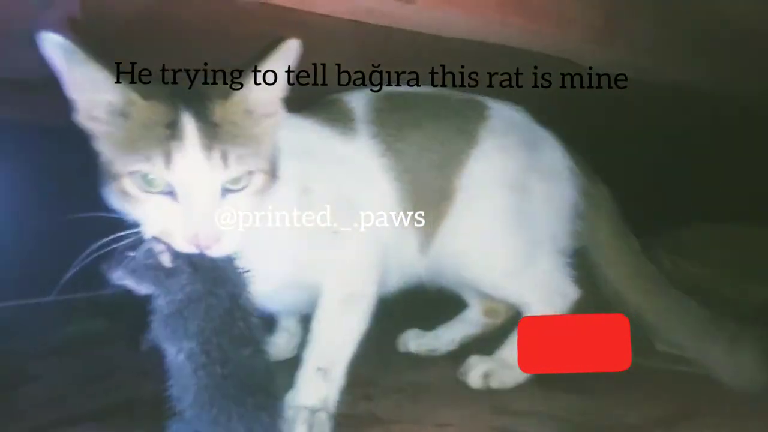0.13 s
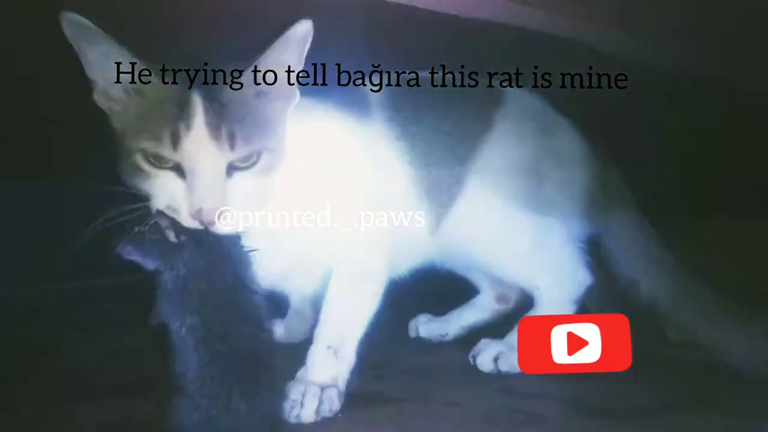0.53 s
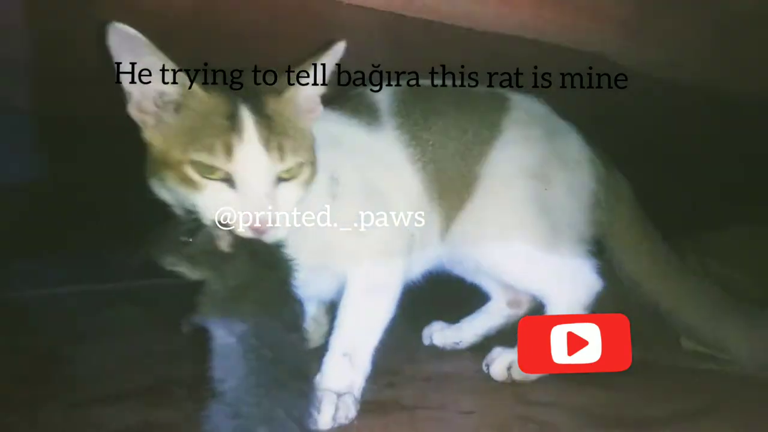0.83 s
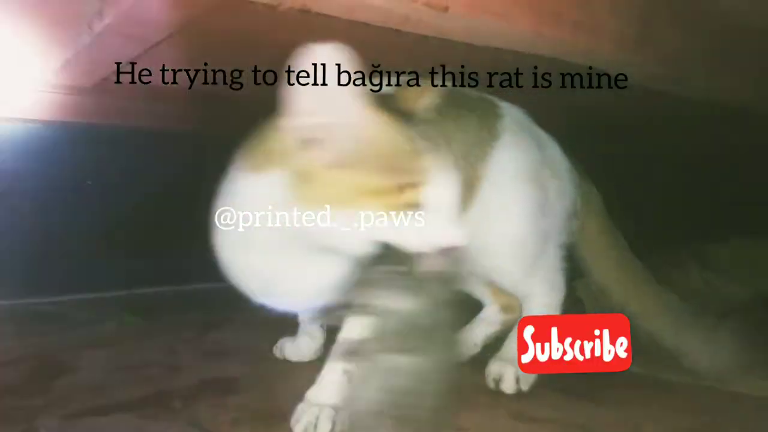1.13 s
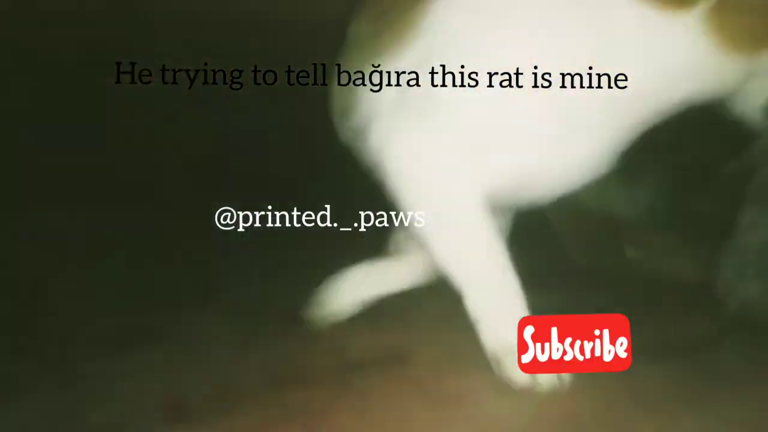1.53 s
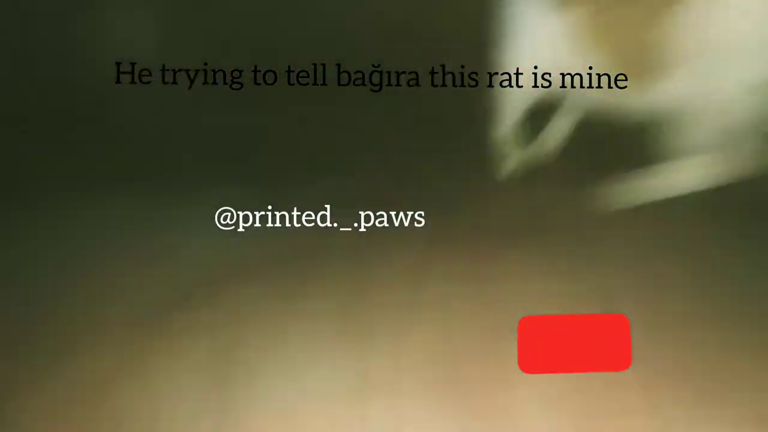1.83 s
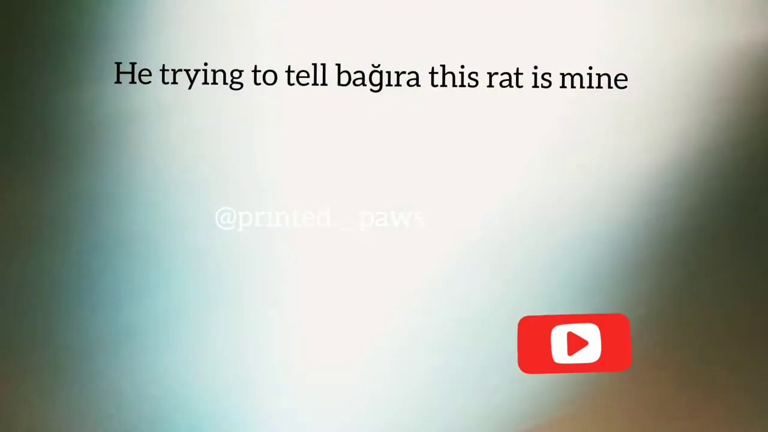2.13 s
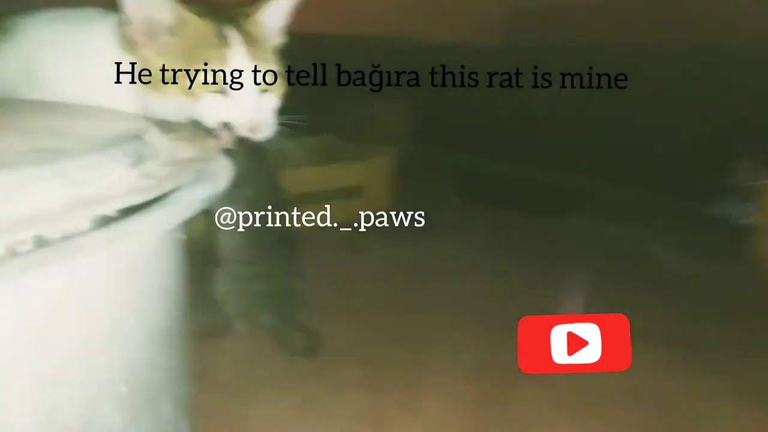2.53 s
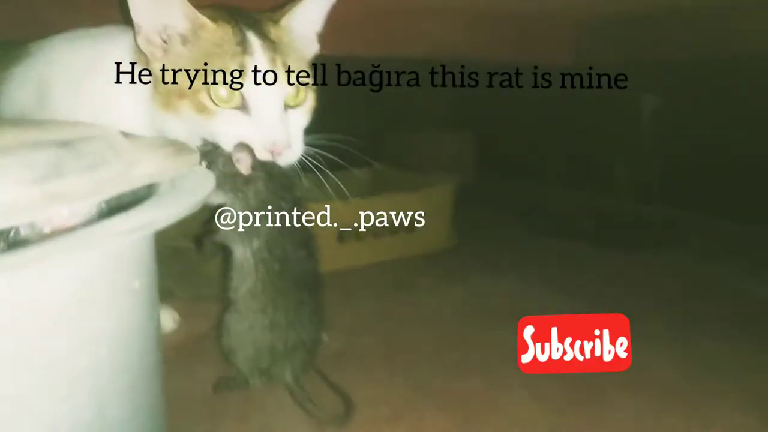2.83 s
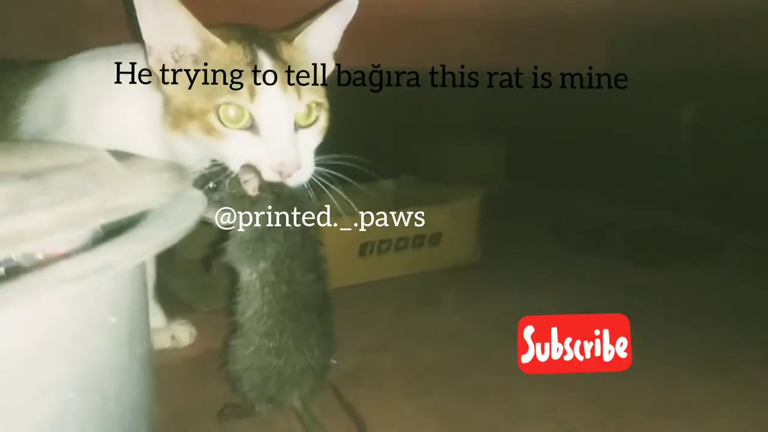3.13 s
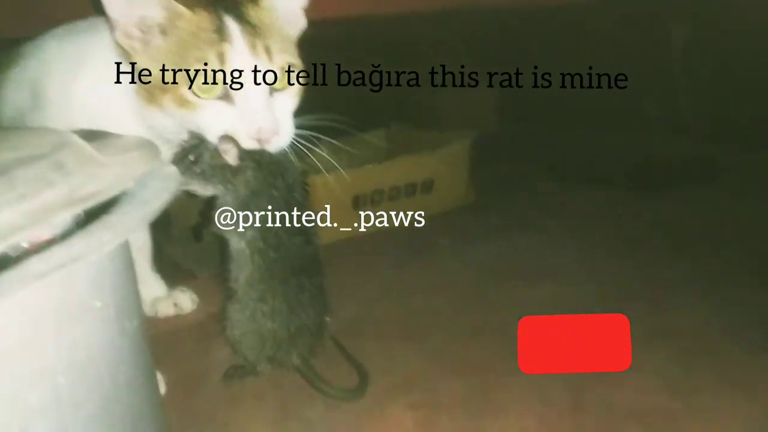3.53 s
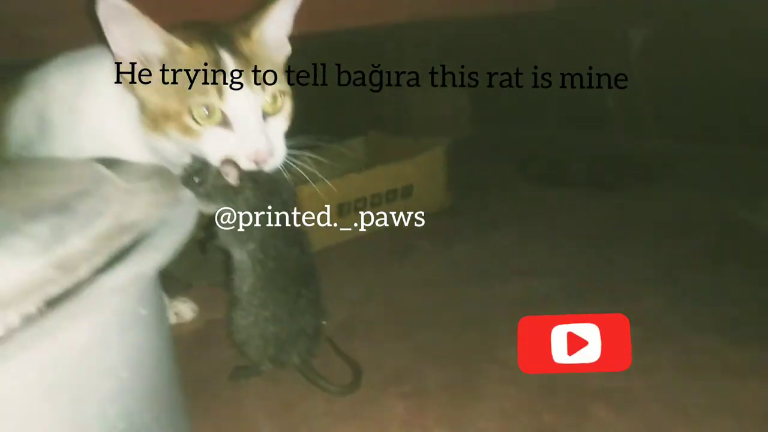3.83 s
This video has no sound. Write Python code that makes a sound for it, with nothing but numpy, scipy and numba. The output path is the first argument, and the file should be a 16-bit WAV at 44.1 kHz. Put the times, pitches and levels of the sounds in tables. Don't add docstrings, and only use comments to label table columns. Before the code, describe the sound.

Low, fluttering cat growl in a dark shed, with rustling, soft paw thuds and throbbing insect trill.

```python
import sys
import numpy as np
from scipy import signal
from scipy.fft import irfft
from scipy.io import wavfile
from scipy.ndimage import uniform_filter1d
from numba import njit

SR = 44100
rng = np.random.default_rng(int(sys.argv[2]) if len(sys.argv) > 2 else 0)


def wav_record(signal):
    frames = np.transpose(np.atleast_2d(signal))
    bounded = np.clip(frames, -1, 1)
    quanta = np.round(bounded * 32767).astype(np.int16)
    wavfile.write(sys.argv[1], SR, quanta)


def magnitude_from_level(level_db):
    exponent = np.asarray(level_db, float) / 20
    return 10 ** exponent


N = 176400


def unit(x):
    return x / np.sqrt(np.mean(x ** 2))


@njit
def svf(x, hz, width):
    y, b, l = np.empty(len(x)), 0., 0.
    g, k = np.tan(np.pi * hz / SR), width / hz
    for i in range(len(x)):
        v = (b + g * (x[i] - l)) / (1 + g * (g + k))
        b, l, y[i] = 2 * v - b, l + 2 * g * v, k * v
    return y


def band(x, hz, width):
    once = svf(x, 1. * hz, 1. * width)
    return svf(once, 1. * hz, 1. * width)


def walk(rate):
    k = int(SR / rate)
    steps = np.repeat(rng.standard_normal(N // k + 1), k)
    return 1.3 * uniform_filter1d(uniform_filter1d(steps, k), k)[:N]


def shape(table, hz):
    curve_hz, curve_db = np.array(table).T
    return np.interp(np.log(hz), np.log(curve_hz), curve_db)


def pair(hz, width, like):
    f = np.fft.rfftfreq(N, 1 / SR)
    near = np.abs(f - hz) < 3 * width
    spec = np.zeros((2, len(f)), complex)
    z = rng.standard_normal((2, 2, len(f)), dtype=np.float32)[:, :, near]
    bell = np.exp(-2 * ((f[near] - hz) / width) ** 2)
    spec[:, near] = (z[0] + 1j * z[1]) * bell
    middle, side = (unit(v) for v in irfft(spec, N))
    like = np.clip(like, 0, 1)
    return np.sqrt((1 + like) / 2) * middle + np.sqrt((1 - like) / 2) * side * np.array([[1], [-1]])


def hump(t, at, rise, fall):
    before = np.exp(-np.minimum((at - t) / rise, 9) ** 2)
    after = np.exp(-np.maximum(t - at, 0) / fall)
    return np.where(t < at, before, after)


def drones(t):
    # (pitch [Hz], width [Hz], level [dB], fade time [s])
    steady = [
        (1206, 79, -58, 1.63),
        (1239, 140, -61, 4.8),
        (1352, 105, -59.5, 1.01),
        (4190, 430, -63, 1.125),
        (14900, 900, -75, 0.5),
        (11870, 250, -69, 0.61),
        (500, 140, -64.5, 2.5),
    ]
    out = 0
    for hz, width, db, end in steady:
        fade_db = 14 / (1 + np.exp((end - t) / .12))
        out = out + magnitude_from_level(db + 2 * walk(10) - fade_db) * pair(hz, width, .1)
    return out


def rustle_and_night(t):
    # (peak time [s], rise [s], fall [s], level [dB], brightness [dB per octave])
    rustles = [(1.05, 0.045, 0.028, -69, 9), (1.535, 0.013, 0.012, -48, 5.5), (2.05, 0.21, 0.89, -56, -1.5),
               (2.13, 0.033, .06, -59, 8), (2.258, 0.13, 0.21, -44, 2.5), (2.36, 0.023, 0.047, -55.5, 7),
               (2.44, 0.14, 0.07, -55.5, 8), (2.6, 0.061, 0.038, -68, -7), (2.772, 0.049, 0.053, -52, 7),
               (3.092, 0.045, 0.11, -46, 6.5), (3.26, 0.032, 0.025, -59.5, 10), (3.2, 0.82, 1, -57.5, -3),
               (3.424, .006, 0.0084, -50, 11), (1.495, 0.011, .01, -60, 4.5), (1.3, 0.017, .02, -73, 6),
               (3.618, 0.014, 0.0077, -36.5, 6), (3.73, 0.043, 0.011, -63, 10)]
    # (frequency [Hz], level [dB])
    cloth_colour = [(290, -20.5), (500, 6.5), (604, -11.5), (1020, 2.5), (1400, -0.5), (4660, -9.5),
                    (7860, -6), (16000, -19)]
    # (frequency [Hz], level [dB])
    night_colour = [(40, -7.5), (230, -14.5), (400, -4.5), (1300, -3), (2600, -8), (4800, -16), (9000, -13),
                    (16000, -31.5)]
    night_db = -50
    grain = magnitude_from_level(1.73 * walk(40.03) + 0.83 * walk(400))
    peak_s, rise_s, fall_s, rustle_db, bright = np.array(rustles).T
    swells = np.array([hump(t, s, a, b) for s, a, b in zip(peak_s, rise_s, fall_s)])
    swells = uniform_filter1d(swells, size=200, axis=1)
    out = 0
    for hz in 40 * 2 ** np.arange(0, 8.7, .5):
        like = .8 - np.log2(hz / 40) / 6
        wider_db = 10 * np.log10(hz)
        patchy_db = 2.0 + 3 * (hz < 300) + .8 * (hz > 4000)
        night = magnitude_from_level(night_db - 37.5 + shape(night_colour, hz) + wider_db + patchy_db * walk(12))
        cloth = magnitude_from_level(rustle_db - 35.5 + bright * np.log2(hz / 5000)) @ swells
        bass_cut_db = 16 * max(np.log2(500 / hz), 0)
        colour_db = shape(cloth_colour, hz) + wider_db - bass_cut_db
        cloth = cloth * magnitude_from_level(colour_db + 1.2 * walk(22.01)) * grain
        cloth = cloth * magnitude_from_level(np.array([[-.4], [.4]]))
        out = out + np.hypot(night, cloth) * pair(hz, hz / 2.36, like)
    return out


def katydid(t):
    # (first throb [s], throb period [s], start [s], stop [s], peak level [dB])
    spells = [
        (.008, .1082, 0, 1.15, -54),
        (1.255, .1045, 1.2, 2.12, -54),
        (2.19, .107, 2.15, 4, -53),
    ]
    # (rise [s], fall [s])
    throb = (.022, .03)
    trill_db = -63
    env, spread = magnitude_from_level(trill_db), rng.standard_normal((40, 2))
    for first, period, start, stop, db in spells:
        for k in range(38):
            s = first + k * period + 0.0047 * spread[k, 0]
            if start - .05 < s < stop:
                env = env + magnitude_from_level(db + 1.5 * spread[k, 1]) * hump(t, s, *throb)
    flicker = magnitude_from_level(2 * walk(120))
    return env * flicker * (pair(7700, 330, 0.33) + magnitude_from_level(-5.0) * pair(7800, 720, .1))


def thuds(t):
    # (time [s], level [dB], pitch [Hz], ring time [s])
    bumps = [(1.272, -69, 270, 0.016), (1.455, -59, 216, 0.018), (1.624, -63, 254, 0.012),
             (1.715, -58, 347, 0.032), (1.781, -58.5, 340, 0.089), (1.839, -64.5, 296, .05),
             (1.944, -53.5, 262, 0.037), (2.502, -56.5, 334, 0.039), (2.75, -50.5, 332, 0.073),
             (3.821, -57, 363, 0.072), (1.788, -72.5, 90, 0.015), (1.861, -73, 140, 0.014),
             (1.349, -74, 78, 0.014), (3.641, -62, 81.5, .06), (3.931, -59, 72, 0.028),
             (1.06, -50, 82.5, 0.054), (1.09, -52, 362, 0.022), (1.199, -61, 81.5, 0.057),
             (2.001, -55, 84, 0.12), (2.66, -59, 76.5, 0.04)]
    out = 0
    for s, db, hz, ring in bumps:
        env = hump(t, s + 0.013, 0.011, ring / 3)
        out = out + magnitude_from_level(db + 14) * env * np.sin(2 * np.pi * hz * (t - s))
    return out * magnitude_from_level(np.array([[.6], [-.6]]))


def scuffs(t):
    # (time [s], length [s], level [dB], pitch [Hz], width [Hz])
    drags = [(1.05, .045, -57, 14900, 800), (1.04, .045, -63, 13700, 600), (1.05, .025, -58, 3400, 460),
             (2.4, 0.019, -52, 2300, 250), (1.215, .008, -53.5, 2250, 300), (2.29, 0.21, -56.5, 446, 99),
             (1.78, 0.09, -61.5, 250, 96), (.14, 0.063, -51, 1290, 110), (1.54, 0.0091, -47, 6500, 660),
             (5.8, .007, -45, 11000, 2200), (3.584, 0.0042, -40, 1030, 450),
             (3.612, 0.0064, -43.5, 8400, 1300), (1.88, .002, -47, 1400, 900), (1.8, 0.051, -57, 465, 200),
             (1.41, 0.047, -55, 364, 64), (1.144, 0.093, -47.5, 271, 46), (1.03, 0.085, -47, 335, 36)]
    out = 0
    for s, length, db, hz, width in drags:
        env = hump(t, s, length, 0.8 * length)
        puff = env * pair(hz, width, 0.33)
        even = np.sqrt(np.mean(env ** 2) / np.mean(puff ** 2))
        out = out + magnitude_from_level(db) * puff * even
    return out


def ticks(t):
    # (time [s], peak level [dB], pitch [Hz], left over right [dB])
    snaps = [
        (3.424, -27, 4400, 12),
        (3.6162, -16, 3700, 14),
    ]
    out = 0
    for s, db, hz, pan_db in snaps:
        level = magnitude_from_level(db + np.array([[.5], [-.5]]) * pan_db)
        out = out + level * hump(t, s, .00012, .0002) * np.sin(2 * np.pi * hz * (t - s) + 1)
    return out


def phase(hz):
    return 2 * np.pi * np.cumsum(hz) / SR


def growl(t):
    # (time [s], chest level [dB], fold pitch [Hz], rasp share [0-1], upper sideband [dB],
    # mouth level [dB])
    first_growl = [
        (0, -33, 180.7, 0.01, -20.5, -17),
        (.3, -32, 181, 0.14, -9, -12),
        (.66, -31, 186.9, 0.18, -17.5, -28),
        (.74, -29, 191.5, 0.57, -15.5, -16),
        (.9, -38, 179.8, 0.72, -3, -21),
        (1.04, -34.5, 152, 0.77, -13, -13.5),
        (1.08, -43.5, 102, 0.16, -16, -8),
        (1.22, -43, 99.7, 0.03, -21, -17.5),
        (1.27, -87, 91, .5, -10, -10),
    ]
    second_growl = [
        (1.97, -66, 119.6, .5, -7.5, -5),
        (2.047, -33, 135.2, 0.65, -10, -17),
        (2.13, -40.5, 146, 0.18, -1, -29),
        (2.45, -41, 144, 0.44, -1, -21),
        (2.75, -42, 151.7, 0.7, 0, -2),
        (3.05, -39.5, 160.5, 0.71, -6, -2.5),
        (3.298, -39.5, 151.8, 0.99, 6, -3.5),
        (3.581, -42, 171.9, 0.72, -3, -3.5),
        (3.632, -43.5, 174, 0.58, -4, -11),
    ]
    third_growl = [
        (3.598, -45.5, 195.5, 0.12, -23, -23),
        (3.642, -33, 192.4, .08, -13, -20.5),
        (3.77, -38, 183.2, 0.067, -21, -36),
        (3.878, -40, 165.7, 0.27, -23, -21),
        (3.939, -39, 153, 0.22, -31, -24),
        (3.955, -81, 156, 0.088, -20, -17),
    ]
    # (pitch [Hz], width [Hz], level [dB])
    mouth_rings = [(350.7, 48, 1), (483.5, 73, 1.5), (231, 63, -1.5), (578, 240, -15)]
    # (time [s], extra level [dB])
    surges = [(.205, -2), (0.251, -7), (.505, -2), (.69, 4.5), (.733, -7.5), (1.09, 1.5), (1.15, -2),
              (1.2, 4), (2.28, 5), (2.31, -2), (2.859, 3), (2.941, 6), (3.042, 6.5), (3.105, 5), (3.173, 5),
              (3.263, 7.5), (3.335, 2.5), (3.294, -12), (3.39, -4)]
    flutter_hz, rasp_rate_hz, jitter = 58, 52, .006
    chest_hz, chest_width_hz = 156, 76.5

    slap_count = np.floor(phase(rasp_rate_hz * (1 + .25 * walk(40))) / (2 * np.pi))
    slaps = np.diff(slap_count, prepend=0) * magnitude_from_level(3.13 * walk(60)) * magnitude_from_level(1.6 * walk(13))
    slaps = slaps + 0.0021 * rng.standard_normal(N)
    rasp = unit(band(slaps, chest_hz, chest_width_hz))
    mouth = 0
    for hz, width, db in mouth_rings:
        breathy = 0.25 * slaps + 0.049 * rng.standard_normal(N)
        mouth = mouth + magnitude_from_level(db) * band(breathy, hz, width)
    mouth = unit(mouth)
    under = unit(band(slaps, 60, 140))

    wobble = walk(50)
    flutter = phase(flutter_hz * (1 + 0.061 * walk(15)))
    tone_waver, side_waver = walk(30.31), walk(25.28)
    out = 0
    for rows in (first_growl, second_growl, third_growl):
        r = np.array(rows).T
        db, hz, share, side_db, mouth_db = (np.interp(t, r[0], c) for c in r[1:])
        share = np.clip(share, 0, 1)
        angle = phase(hz * (1 + jitter * (1 + 6 * share) * wobble))
        tone = magnitude_from_level(1.9 * share * tone_waver) * (np.sin(angle) + magnitude_from_level(-24.5) * np.sin(2 * angle))
        sides = np.sin(angle + flutter) + magnitude_from_level(-17.0) * np.sin(angle - flutter)
        tone = tone + magnitude_from_level(side_db + 3.2 * side_waver) * sides
        voice = np.sqrt(2 - 2 * share) * tone + np.sqrt(share) * rasp
        voice = voice + magnitude_from_level(mouth_db) * mouth + magnitude_from_level(-29) * under
        out = out + voice * magnitude_from_level(db) * (t >= r[0, 0]) * (t <= r[0, -1])
    surge_db = sum(db * hump(t, s, .022, .012) for s, db in surges)
    out = out * magnitude_from_level(surge_db - 1)
    return signal.sosfilt(signal.butter(4, 95, "high", fs=SR, output="sos"), out)


def scene():
    t = np.arange(N) / SR
    cat = growl(t)
    pan_db = np.interp(t, [1.2, 2.6], [0, -.8])
    cat_pair = cat * magnitude_from_level(np.array([[1], [-1]]) * pan_db)
    room = svf(cat, 203.0, 280.0)
    echo = magnitude_from_level(-7) * np.array([np.roll(room, 300), -np.roll(room, 420)])
    left = magnitude_from_level(np.array([[1.9], [-1.9]]))
    night = left * (katydid(t) + rustle_and_night(t) + drones(t))
    return cat_pair + echo + thuds(t) + scuffs(t) + ticks(t) + night


def suppress(x):
    bin_gate, band_gate, gate_from_hz, gate_below_hz = .7, .5, 4450, 355
    holes_from_hz, hole_rarity, hole_db = 2900, 1.0, -50
    f, _, z = signal.stft(x, SR, nperseg=2048)
    column = f[:, None]
    p = np.abs(z) ** 2
    frames = p.shape[2]
    near = uniform_filter1d(p, size=70, axis=1, origin=20)
    around = near.mean(0)
    calm = np.median(around, axis=1, keepdims=True)
    guard = 1 - .8 * (np.abs(column - 7500) < 800)

    fickle = np.repeat(np.repeat(magnitude_from_level(5 * rng.standard_normal((60, 60))), 18, axis=0), 3, axis=1)
    fickle = fickle[:len(f), :frames]
    blocks = uniform_filter1d(p.mean(0), size=9, axis=0)[4::9]
    blocks = np.repeat(blocks, 9, axis=0)[:len(f)]
    block_limit = band_gate * guard * around * np.minimum(fickle, calm / around + .7)
    high = (p > bin_gate * guard * near) & (blocks > block_limit)
    low = p.max(0) > magnitude_from_level(2 * np.where(column > 270, -67, -76))
    keep = np.where(column > gate_from_hz, high, np.where(column < gate_below_hz, low, True))

    field = np.repeat(rng.standard_normal((90, frames)), 16, axis=0)[:len(f)]
    field = uniform_filter1d(field, size=5, axis=1)
    loud = np.clip(np.log10(around / calm), -.3, 1)
    hole = field / field.std() > hole_rarity + .4 * loud + (column < gate_from_hz) / 2
    hole = hole & (column > holes_from_hz) & (guard == 1)
    floor = np.where(np.abs(column - 280) < 80, .2, .07)
    gain = np.where(hole, magnitude_from_level(hole_db), np.maximum(keep, floor))
    return signal.istft(z * gain, SR, nperseg=2048)[1][:, :N]


def low_pass(x):
    return signal.sosfilt(signal.butter(12, 15850, fs=SR, output="sos"), x)


def record(dry):
    top_cut = signal.ellip(8, .2, 70, 15850, fs=SR, output="sos")
    mix = signal.sosfilt(top_cut, suppress(dry))
    return low_pass(mix)


dry = scene()
out = record(dry)
wav_record(out)
```